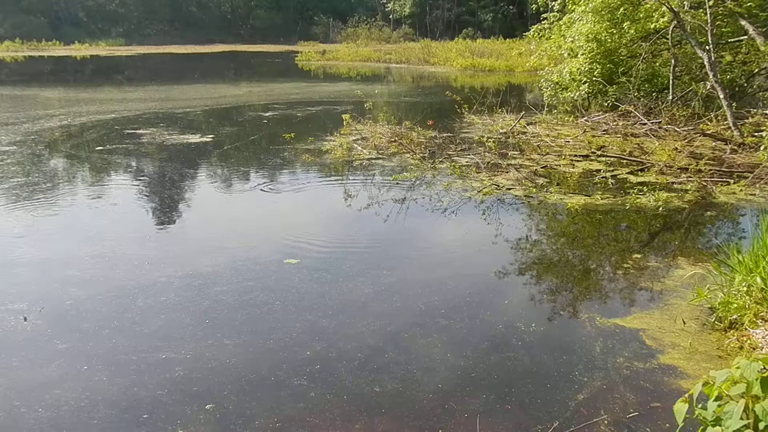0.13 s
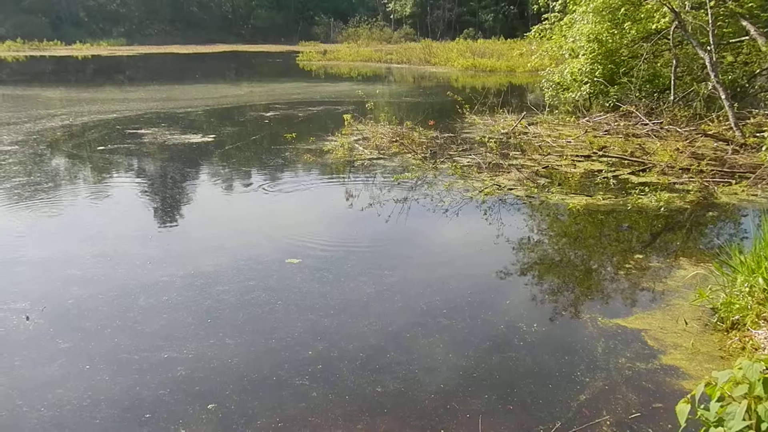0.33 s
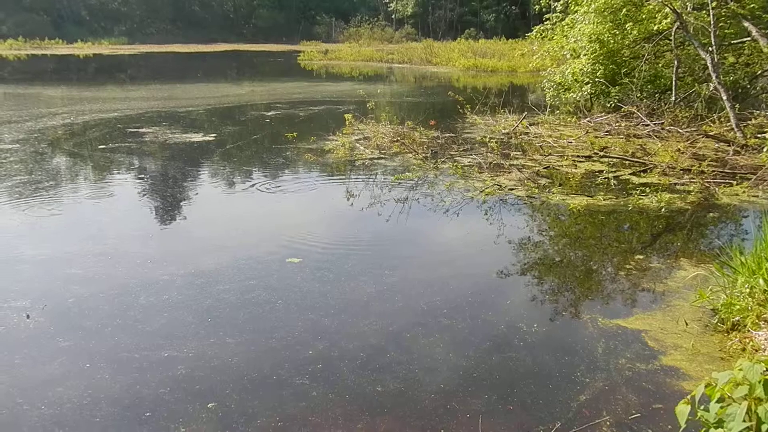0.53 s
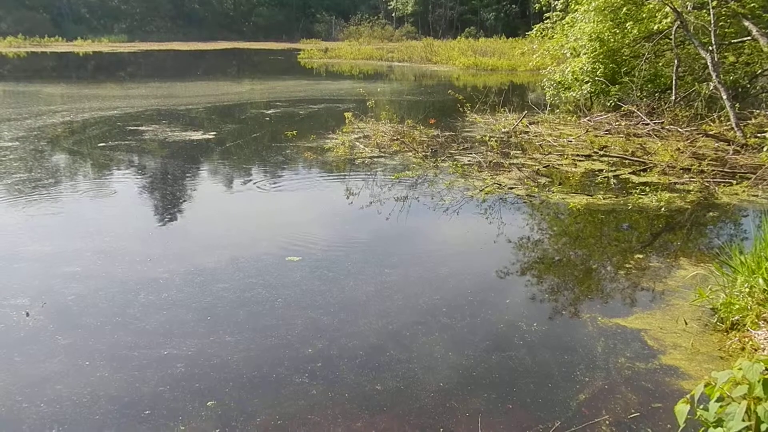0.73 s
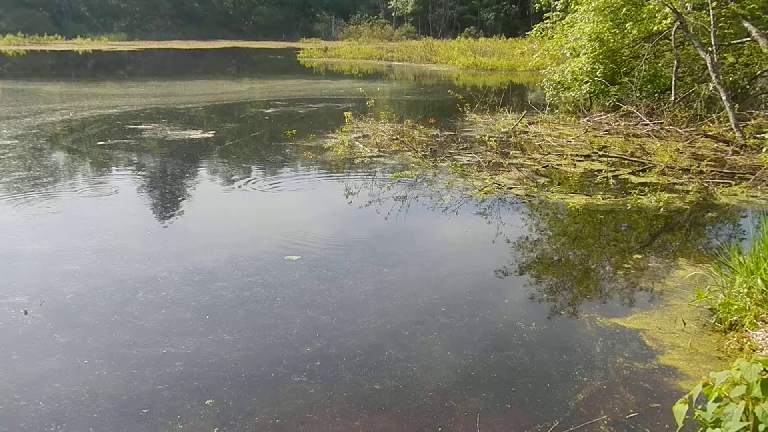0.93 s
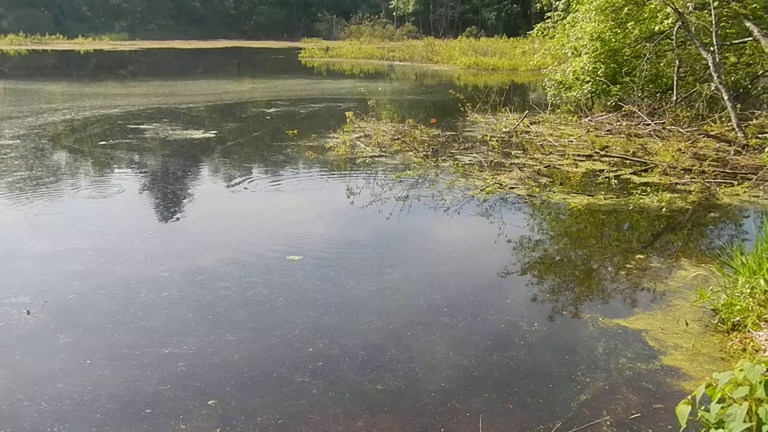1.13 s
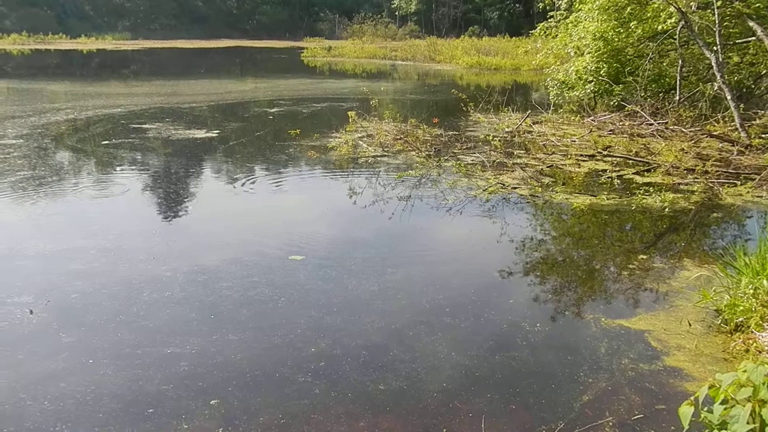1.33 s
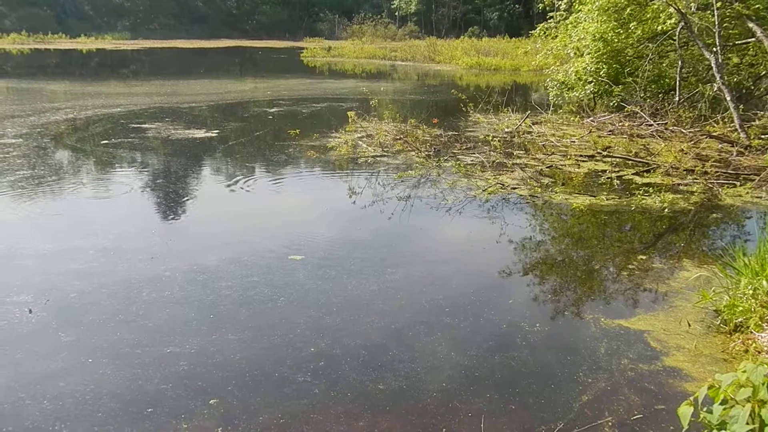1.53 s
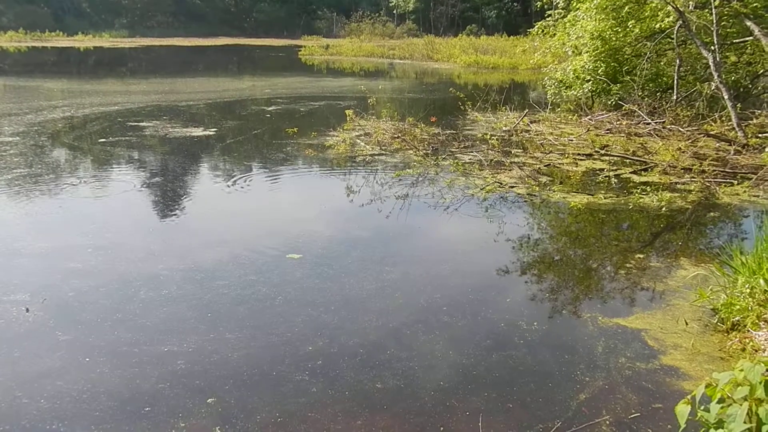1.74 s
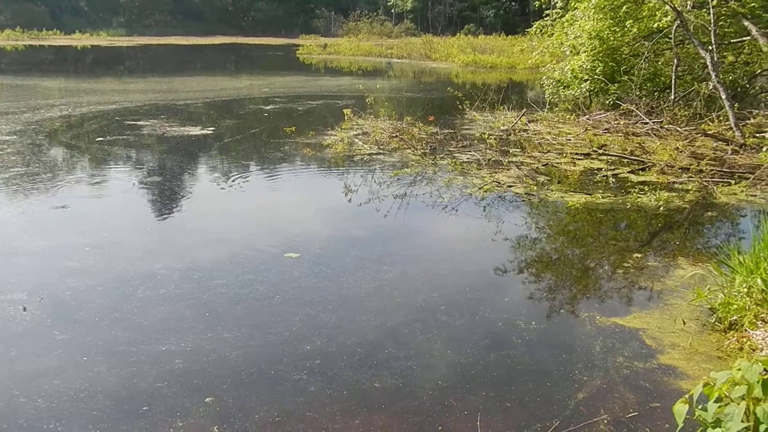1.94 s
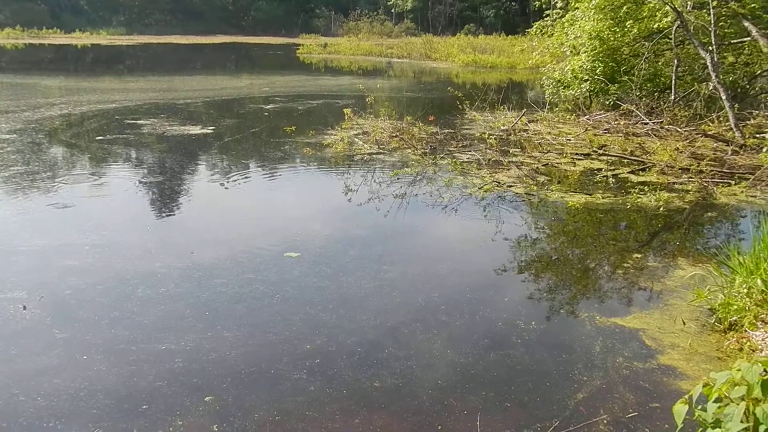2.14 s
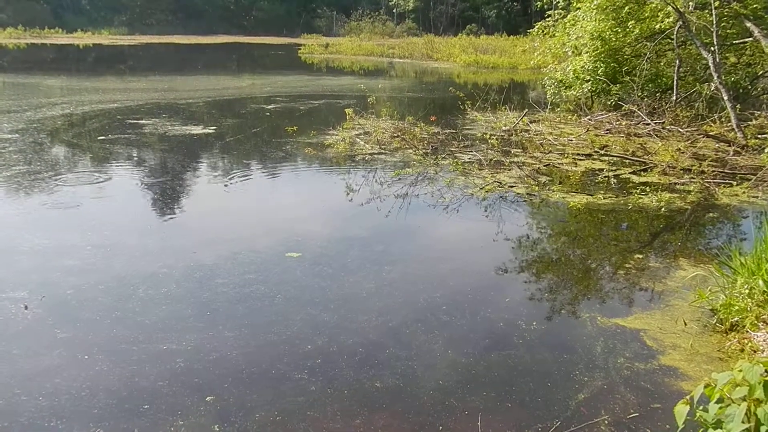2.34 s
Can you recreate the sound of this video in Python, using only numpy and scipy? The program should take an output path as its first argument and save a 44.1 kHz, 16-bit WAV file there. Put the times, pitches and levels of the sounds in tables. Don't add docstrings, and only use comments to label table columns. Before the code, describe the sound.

Two deep, drawn-out bullfrog calls over faint hiss, with finger knocks at the start.

```python
import sys
import numpy as np
from scipy import signal
from scipy.fft import rfft, irfft, next_fast_len
from scipy.io import wavfile
from scipy.ndimage import uniform_filter1d, map_coordinates

SR = 44100
rng = np.random.default_rng(int(sys.argv[2]) if len(sys.argv) > 2 else 0)


def to_linear_factor(level_db):
    exponent = np.asarray(level_db, float) / 20
    return 10 ** exponent


def store_pcm(level_fs):
    pcm = np.round(np.clip(level_fs, -1, 1) * 32767).astype(np.int16)
    wavfile.write(sys.argv[1], SR, np.atleast_2d(pcm).T)


N = 105840
TIME = np.arange(N) / SR


def unit(x):
    return x / np.sqrt(np.mean(x ** 2) + 1e-20)


def along(points, hz):
    f, v = np.transpose(points)
    return np.interp(np.log(hz + 1), np.log(f + 1), v)


def wobble(rate):
    knots = rng.standard_normal(int(N * rate / SR) + 4)
    return map_coordinates(knots, [np.arange(N) * rate / SR])


def filtered(x, response):
    m = next_fast_len(N + SR // 2)
    return irfft(rfft(x, m) * response(np.fft.rfftfreq(m, 1 / SR)), m)[..., :N]


def resonant(x, peaks):
    def response(f):
        total = 0
        for k, (center, width, db) in enumerate(peaks):
            total = total + (-1) ** k * to_linear_factor(db) * 1j * f * width / (center * center - f * f + 1j * f * width)
        return total
    return filtered(x, response)


def puff(start_s, length_s, hz, width_hz):
    narrow = [(hz, width_hz, 0)]
    noise = unit(resonant(resonant(rng.standard_normal(N), narrow), narrow))
    return noise * np.exp(-((TIME - start_s) / length_s) ** 2 / 2)


# freq_hz, likeness
CHANNEL_LIKENESS = [(60, 0.72), (180, 0.84), (550, 0.54), (1650, 0.68), (4970, 0.017), (15000, 0.19)]
# freq_hz, left_over_right_db
CHANNEL_LEAN = [(60, 2), (240, 3), (950, 2), (3770, 1.5), (15000, -3)]


def rush(spectrum, patchy_db):
    z = signal.stft(rng.standard_normal((2, N)), nperseg=512)[2]
    field = uniform_filter1d(uniform_filter1d(rng.standard_normal(z.shape[1:]), 5, 0), 8, 1)
    pair = signal.istft(z * to_linear_factor(patchy_db * unit(field)), nperseg=512)[1][:, :N]

    def mid_side(hz):
        angle = np.arccos(np.clip(along(CHANNEL_LIKENESS, hz), -1, 1)) / 2
        return to_linear_factor(along(spectrum, hz)) * [np.cos(angle), np.sin(angle)]

    mid, side = filtered(pair, mid_side)
    lean = lambda hz: to_linear_factor(np.outer([.5, -.5], along(CHANNEL_LEAN, hz)))
    return unit(filtered(np.array([mid + side, mid - side]), lean))


# freq_hz, density_db per Hz
AIR_SPECTRUM = [(12, -44), (20, -10), (54, -15), (92, -2), (129, -14), (151, -7.5), (320, -15),
                (419, -18.5), (900, -22), (1170, -97), (1980, -120)]
AIR_DB = -49


def air():
    return to_linear_factor(AIR_DB + 1.17 + 0.41 * wobble(4.9)) * rush(AIR_SPECTRUM, patchy_db=0.5)


# freq_hz, density_db per Hz
HISS_SPECTRUM = [(350, -34), (600, -7.5), (1000, 3), (1220, -1.5), (1470, 1.5), (2460, -6.5), (6000, -16.5),
                 (14000, -21)]
HISS_DB, HISS_TOP_HZ, HISS_OVER_DB = -53, 13950, -45


def hiss():
    shelf = lambda hz: to_linear_factor(HISS_OVER_DB * np.clip((hz - HISS_TOP_HZ) / 500, 0, 1))
    return to_linear_factor(HISS_DB + 1.3 + 0.3 * wobble(4.7)) * filtered(rush(HISS_SPECTRUM, patchy_db=1.5), shelf)


WHINE_HZ, WHINE_DB = 14835, -62.5


def whine():
    return np.sqrt(2) * to_linear_factor(WHINE_DB + 0.69 * wobble(40)) * np.sin(2 * np.pi * WHINE_HZ * TIME)


# peak_s, level_db, center_hz
REED_STIRS = [
    (2.16, -60.5, 3320),
    (2.225, -61, 3790),
    (2.239, -56, 3480),
    (2.241, -49.5, 1150),
    (2.252, -52, 2150),
    (2.27, -57.5, 2830),
]
RUSTLE_S, RUSTLE_WIDE_HZ = .009, 800


def rustle():
    return sum(to_linear_factor(db) * puff(s, RUSTLE_S, hz, RUSTLE_WIDE_HZ) for s, db, hz in REED_STIRS)


SHIMMER_DB = 1.2


def pulses(cycles):
    return np.diff(np.floor(cycles), prepend=0) * to_linear_factor(SHIMMER_DB * rng.standard_normal(N))


# start_s, length_s, pitch_hz, level_db
FAR_CROAKS = [
    (0.846, 0.15, 94.5, -46),
    (1.266, 0.22, 97, -74.5),
    (2.05, 0.033, 98, -52),
]
# center_hz, width_hz, level_db
FAR_FORMANTS = [(209, 60, -13), (383, 37.4, -0.5), (565, 68, -8), (1050, 258, -17)]


def far_frog():
    out = np.zeros(N)
    for s, length, hz, db in FAR_CROAKS:
        cycles = np.cumsum(hz * (1 + 0.0078 * wobble(30))) / SR
        voice = unit(resonant(pulses(cycles), FAR_FORMANTS))
        out += to_linear_factor(db) * voice * np.sin(np.pi * np.clip((TIME - s) / length, 0, 1))
    return out


# freq_hz, level_db, t60_s
THUMP_MODES = [(259, 4.5, 0.016), (134, -46, 0.017), (398, -3, 0.016), (734, -29, 0.036)]


def ring(t):
    return sum(to_linear_factor(db + rng.normal(0, 3.8) - 60 * t / t60) * np.sin(2 * np.pi * hz * t)
               for hz, db, t60 in THUMP_MODES)


# start_s, click_db, thump_over_click_db, tick_over_click_db
FINGER_KNOCKS = [
    (0.138, -18, 3, -10.5),
    (0.1612, -16, 6, -19),
    (.187, -22, 7.5, -17),
    (0.1962, -28.5, -4, -6),
    (.221, -25, 8, -17),
    (0.264, -21.5, 8, -17),
    (0.447, -42.5, 13, -26),
]
# center_hz, width_hz, level_db
SHELL_MODES = [(704, 240, -7), (1080, 230, 5.5), (1540, 640, 2.5), (2270, 860, -2.5), (2910, 680, -10)]
# center_hz, width_hz, level_db
TICK_MODES = [(4700, 780, -1.5), (7740, 2060, -11), (9460, 2600, -8)]
SNAP, SNAP_S, SNAP_AGAIN_S, SNAP_AGAIN = 3, .00006, .0012, .4
CONTACT_S, SCRAPE_S, SCRAPE_DB, TICK_S = .002, .006, -6, 0.0011
THUMP_LAG_S, REBOUND_S, REBOUND_DB = 0.001, 0.00802, -9
THUMP_LEFT_DB, CLICK_RIGHT_DB = -14, -5


def handling():
    blows, ticks, out = np.zeros((3, 2, N + SR))
    t = np.arange(SR // 10) / SR
    contacts = ((0, 1), (SNAP_AGAIN_S, SNAP_AGAIN))
    snap = -SNAP * sum(g * np.exp(-((t - at) / SNAP_S - 3) ** 2 / 2) for at, g in contacts)
    scrape = np.exp(-t / CONTACT_S) + to_linear_factor(SCRAPE_DB) * np.exp(-t / SCRAPE_S)
    tick = t / TICK_S * np.exp(1 - t / TICK_S)
    click_sides = to_linear_factor([[0], [CLICK_RIGHT_DB]])
    thump_sides = np.array([[-to_linear_factor(THUMP_LEFT_DB)], [1]])

    def add(track, s, sound):
        track[:, round(s * SR):][:, :len(t)] += sound

    for s, db, thump_db, tick_db in FINGER_KNOCKS:
        a, b, c = rng.standard_normal((3, len(t)))
        add(blows, s, to_linear_factor(db + 1) * click_sides * (snap + scrape * [a, 2.2 * a + 0.48 * b]))
        add(ticks, s, to_linear_factor(db + tick_db + 6.5) * tick * [c, 0.23 * c + 0.77 * b])
        for lag, loss_db in ((THUMP_LAG_S, 0), (THUMP_LAG_S + REBOUND_S, REBOUND_DB)):
            thump = ring(t) * (1 - np.exp(-t / .001))
            add(out, s + lag, to_linear_factor(db + thump_db + loss_db) * thump_sides * thump)
    return out[:, :N] + resonant(blows[:, :N], SHELL_MODES) + resonant(ticks[:, :N], TICK_MODES)


# peak_s, gulp_db, gulp_hz, rasp_db, rasp_hz
VOICE_CATCHES = [
    (0.632, -42, 295, -46, 1330),
    (.654, -46, 350, -46, 1930),
    (0.766, -36.5, 295, -42, 1260),
    (.866, -45, 468, -39.5, 1800),
    (1.956, -43, 312, -45.5, 1470),
]
CATCH_S, GLIDE = .009, .25
RASP_S, RASP_WIDE_HZ = .008, 300


def catches():
    out = np.zeros(N)
    for s, db, low_hz, rasp_db, rasp_hz in VOICE_CATCHES:
        u = (TIME - s) / CATCH_S
        phase = 2 * np.pi * low_hz * (TIME - s) * (1 + GLIDE * np.clip(u, -3, 3) / 4)
        gulp = np.sqrt(2) * np.sin(phase) * np.exp(-u * u / 2)
        out += to_linear_factor(db) * gulp + to_linear_factor(rasp_db) * puff(s, RASP_S, rasp_hz, RASP_WIDE_HZ)
    return out


# start_s, pitch_hz, boom_db, third_partial_over_boom_db, buzz_db
FIRST_CALL = [
    (0.59, 110.3, -59.5, 7, -45),
    (0.616, 108.4, -46, -4.5, -55.5),
    (0.654, 109.7, -50.5, -6, -39.5),
    (0.676, 112.6, -46.5, -4, -52),
    (0.71, 109.7, -44, 0, -41),
    (0.774, 112.1, -43.5, 4, -41),
    (0.94, 111.1, -39.5, -1, -48.5),
    (1.0, 106.5, -49, -3.5, -55.5),
    (1.05, 105.7, -68, 13, -57),
]
SECOND_CALL = [
    (1.65, 107.5, -55, -4, -52),
    (1.745, 108.6, -45.5, -3, -45),
    (1.795, 108.1, -41.5, -5.5, -42.5),
    (1.815, 109.1, -45.5, -0.5, -48.5),
    (1.935, 109.2, -42, -1, -45.5),
    (1.962, 110.7, -51.5, 15, -47),
    (2.005, 109.6, -40.5, -2, -50),
    (2.065, 107.3, -49, 3, -54.5),
    (2.13, 104, -57, 3, -70),
]
# multiple of pitch, level_db
SAC_PARTIALS = [(1, -17), (2, 2.5), (4, -14.5), (5, -34), (6, -17)]
# center_hz, width_hz, level_db
THROAT_FORMANTS = [(1064, 203, 7), (1420, 117, 9.5), (1780, 315, 4.5), (3350, 2700, -13.5)]
JITTER, WAVER_DB, DRIFT_RAD = .004, 3, .4
SING_DB, SING_NEXT_DB = -13, -7
SING_AT, SING_WIDE = .76, .15
GATE_SHARP, BREATH_LEADS = .8, .1
BREATH_START, BREATH_END = .35, .8


def bellow(call):
    start, *columns = np.transpose(call)
    hz, boom_db, third_db, buzz_db = [np.interp(TIME, start, c) for c in columns]
    done = np.clip((TIME - start[0]) / (start[-1] - start[0]), 0, 1)
    cycles = np.cumsum(hz * (1 + JITTER * wobble(60))) / SR

    def partial(k, db):
        level = np.sqrt(2) * to_linear_factor(db + WAVER_DB * wobble(22.08))
        return level * np.cos(2 * np.pi * k * cycles + DRIFT_RAD * wobble(29.98))

    boom = sum(partial(k, db) for k, db in SAC_PARTIALS) + partial(3, third_db)
    sing = (partial(9, 0) + partial(10, SING_NEXT_DB)) * np.exp(-((done - SING_AT) / SING_WIDE) ** 2 / 2)

    gate = np.exp(GATE_SHARP * np.cos(2 * np.pi * (cycles + BREATH_LEADS)))
    breath = rng.standard_normal(N) * gate
    share = BREATH_START + (BREATH_END - BREATH_START) * done
    source = np.sqrt(1 - share) * unit(pulses(cycles)) + np.sqrt(share) * unit(breath)
    buzz = unit(resonant(source, THROAT_FORMANTS))
    buzz = filtered(buzz, lambda f: 1 / (1 + (f / 4500) ** 4))

    on = np.clip(np.minimum(TIME - start[0], start[-1] - TIME) / 0.0086, 0, 1)
    return -on * (to_linear_factor(boom_db) * boom + to_linear_factor(boom_db.max() + SING_DB) * sing + to_linear_factor(buzz_db) * buzz)


POND_T60_S, WET_DB, FROG_LEFT_DB = 0.45, -10, 3.5


def pond(x):
    t = np.arange(SR // 2) / SR
    tail = rng.standard_normal((2, len(t))) * to_linear_factor(-60 * t / POND_T60_S)
    late = np.pad(x, (500, 0))[None]
    return signal.fftconvolve(late, tail / np.linalg.norm(tail[0]), axes=1)[:, :N]


def scene():
    floor = air() + hiss() + whine()
    frogs = rustle() + far_frog() + catches() + bellow(FIRST_CALL) + bellow(SECOND_CALL)
    pan = to_linear_factor([[FROG_LEFT_DB / 2], [-FROG_LEFT_DB / 2]])
    return (frogs + to_linear_factor(WET_DB) * pond(frogs)) * pan + handling() + floor


def low_pass(x):
    return signal.sosfilt(signal.butter(12, 16610, fs=SR, output="sos"), x)


START_S, FADE_S = .1325, .0075
TOP_HZ, LEFT_LAG_S, LAG_TOP_HZ = 15800, 4e-5, 3000


def record(dry):
    def ports(hz):
        phase = np.pi * LEFT_LAG_S * hz / (1 + (hz / LAG_TOP_HZ) ** 2)
        return np.exp(np.outer([-1j, 1j], phase)) * (hz < TOP_HZ)

    fade = np.clip((TIME - START_S) / FADE_S, 0, 1) ** 3
    return low_pass(filtered(dry, ports) * fade)


dry = scene()
out = record(dry)
store_pcm(out)
```